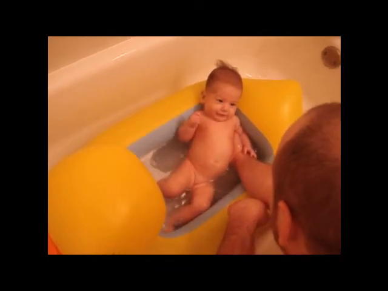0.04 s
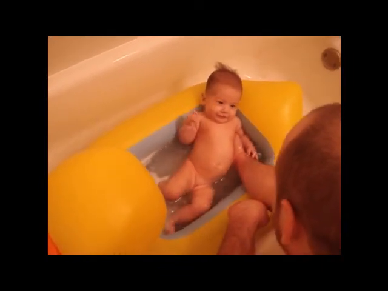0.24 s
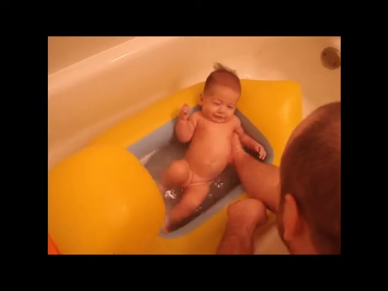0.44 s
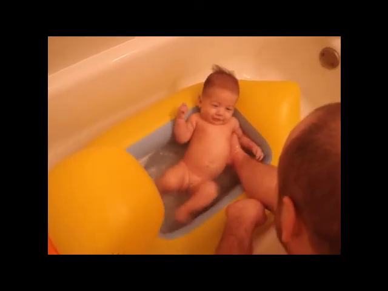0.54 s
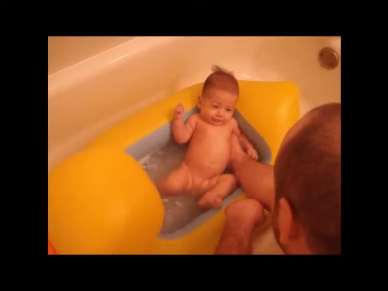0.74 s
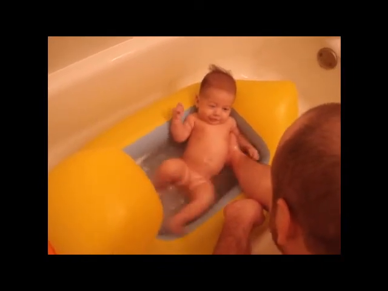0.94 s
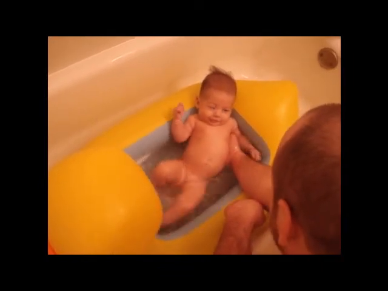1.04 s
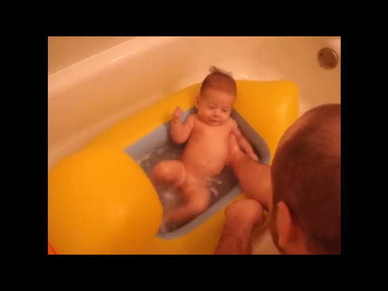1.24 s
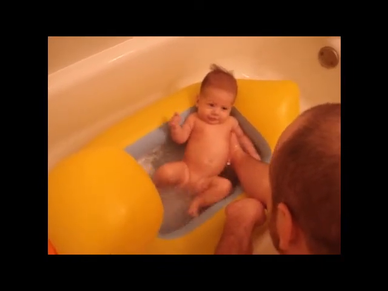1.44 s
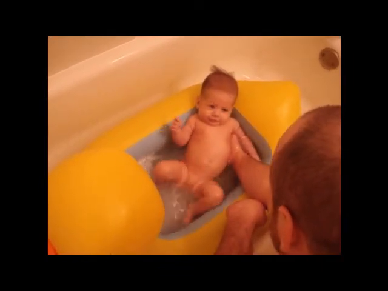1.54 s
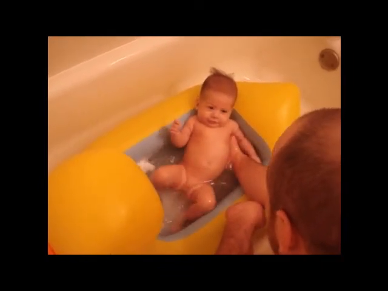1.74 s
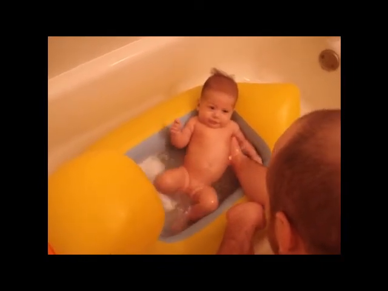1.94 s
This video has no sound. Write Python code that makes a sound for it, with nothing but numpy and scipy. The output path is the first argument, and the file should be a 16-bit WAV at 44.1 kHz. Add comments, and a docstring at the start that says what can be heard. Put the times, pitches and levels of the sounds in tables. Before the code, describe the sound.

Shallow bath water sloshes and splashes close to the microphone under a baby's kicks. A few quiet drips come first, then quick splashes with a soft low bump, then lighter ones. A fan hums faintly in the tiled room.

```python
"""Small legs kick in a shallow inflatable tub that stands in a hard bathtub, while a bathroom fan hums.
First come a few faint bubbles, trapped air ringing upward in pitch, and two soft held notes.
Then the kicks build: water splats and hisses as spray, and one low bump lands just past a second.
The biggest splash follows, squeezed air holds a few more wavering notes, and smaller splats close.
Tub walls and tiles echo the water throughout, over a soft noise floor."""
import sys
import numpy as np
from scipy import signal
from scipy.fft import rfft, irfft, next_fast_len
from scipy.io import wavfile

SR = 44100
rng = np.random.default_rng(int(sys.argv[2]) if len(sys.argv) > 2 else 0)


def transcribe(u):
    """Save the signal u as a 16-bit wav file named by the first command-line argument.

    u: samples, shape (n,) or (channels, n), limited to [-1, 1]; the rate is SR.
    q: integer samples, one column per channel.
    """
    v = np.clip(np.atleast_2d(u).T, -1, 1)
    q = np.round(v * 32767).astype(np.int16)
    wavfile.write(sys.argv[1], SR, q)


N = 88200


def bubbles():
    """Each pocket of trapped air rings as a dying sine that climbs in pitch."""
    # The clearest bubbles. Each row: start in seconds, level in dB, pitch in Hz, t60 in seconds.
    pockets = [(.078, -51, 2430, .04), (.190, -44.5, 2240, 0.015), (.261, -43.5, 2060, 0.023),
               (.667, -45.5, 1440, 0.038), (.704, -29.5, 2050, 0.0091), (.8045, -33, 840, 0.021),
               (.8046, -24, 1510, 0.0063), (.820, -32.5, 1590, 0.018), (.924, -32, 2100, 0.01),
               (.960, -39, 1340, 0.022), (.984, -30, 2620, 0.013), (1.0844, -30, 3840, 0.01),
               (1.0944, -16, 2630, 0.015), (1.102, -25, 2730, 0.0096), (1.1653, -24, 1876, 0.013),
               (1.2246, -29, 3120, 0.017), (1.2326, -19, 1590, 0.018), (1.233, -14, 955, 0.011),
               (1.241, -16.5, 1100, 0.012), (1.2496, -10.5, 1795, 0.0063), (1.2564, -23, 1970, 0.015),
               (1.249, -16.5, 1038, 0.01), (1.257, -23, 1050, 0.018), (1.2655, -15, 1060, 0.014),
               (1.2764, -29.5, 1282, 0.082), (1.2874, -9.5, 3130, 0.0035), (1.3054, -20.5, 1360, 0.06),
               (1.312, -13, 1623, 0.02), (1.319, -26.5, 1680, 0.029), (1.3264, -19, 1616, 0.023),
               (1.329, -17.5, 774, 0.031), (1.3334, -12.5, 1290, 0.018), (1.335, -16, 945, 0.0066),
               (1.371, -35, 783, 0.07), (1.372, -39, 1485, 0.047), (1.4072, -25, 3450, 0.0059),
               (1.427, -29, 1500, 0.021), (1.431, -27.5, 808, .04), (1.472, -25.5, 790, 0.01),
               (1.485, -45.5, 264.4, 0.16), (1.4945, -31, 2530, 0.011), (1.508, -25, 2420, 0.01),
               (1.572, -40.5, 847, 0.03), (1.5738, -28.5, 2300, 0.0097), (1.583, -32, 2540, 0.013),
               (1.735, -28, 774, 0.0095), (1.7434, -27, 1930, 0.0037), (1.8257, -28, 3030, 0.0076),
               (1.8293, -21, 3290, 0.012), (1.853, -36.5, 3410, 0.018), (1.8871, -37.5, 1560, 0.024),
               (1.8876, -34, 2370, 0.036)]
    rise, attack_s = 0.089, 0.00065  # rise: share by which the pitch climbs during one t60
    out, t = np.zeros(N + SR), np.arange(SR // 5) / SR
    for start, db, hz, t60 in pockets:
        phase = 2 * np.pi * hz * (t + rise * t * t / (2 * t60))
        envelope = amp(db - 60 * t / t60) * (1 - np.exp(-t / attack_s))
        i = int(start * SR)
        out[i:i + len(t)] += envelope * np.sin(phase)
    return out[:N]


def splats():
    """Each splat is a swarm of tiny bubbles: crackly noise around one pitch, quick to rise and die."""
    # Each row: start in seconds, level in dB, centre in Hz, width as a share of it, t60 in seconds.
    swarms = [(.590, -49.5, 3500, 1.8, 0.22), (.696, -49.5, 1970, 1.4, 0.4),
              (.755, -37.5, 5930, 0.55, 0.067), (.8040, -41, 5500, 1.2, 0.11),
              (0.8042, -41.5, 1550, 0.81, 0.19), (.848, -42, 4600, 0.41, 0.18), (.918, -45, 1800, 5, 0.11),
              (1.017, -51.5, 3000, 0.21, 0.21), (1.0932, -36, 2600, 0.19, 0.29),
              (1.0941, -39, 4230, 0.63, 0.24), (1.141, -35.5, 5500, 1.5, 0.18),
              (1.1654, -34.5, 2370, 0.99, 0.15), (1.2244, -35, 3100, 0.17, 0.078),
              (1.246, -31, 2800, 0.7, 0.36), (1.300, -36, 6000, 0.71, 0.17),
              (1.449, -38, 4300, 0.63, 0.094), (1.4935, -39.5, 2500, 0.15, 0.29),
              (1.5722, -48, 2400, 0.12, 0.24), (1.5746, -34, 3000, 0.68, 0.015),
              (1.594, -39, 5400, 0.79, 0.26), (1.734, -45.5, 1500, 0.67, 0.16),
              (1.78, -42, 2800, 0.24, 0.089), (1.8251, -32, 3120, 0.31, 0.11),
              (1.8243, -47.5, 5160, 0.47, 0.28), (1.8875, -40.5, 2370, 0.35, 0.17)]
    crackle_db = 4.5
    out, t = np.zeros(N + SR), np.arange(SR // 4) / SR
    for start, db, hz, width, t60 in swarms:
        noise, lumps = rng.standard_normal((2, len(t)))
        crackle = noise * amp(crackle_db * lumps)
        swarm = rms_one(resonate(resonate(crackle, hz, width * hz), hz, width * hz))
        attack_s = 0.0002 * amp(-51.5 - db)  # louder splats bite faster
        envelope = amp(db - 60 * t / t60) * (1 - np.exp(-t / attack_s))
        i = int(start * SR)
        out[i:i + len(t)] += envelope * swarm
    return out[:N]


def spray():
    """Fine drops hiss up and heavier water sloshes below, both riding the kicks."""
    # Swell of the fine drops. Each row: time in seconds, level in dB.
    swell = [(0, -66), (.24, -61), (.27, -54), (.35, -56), (.40, -66.5), (.57, -59), (.74, -59), (.76, -50),
             (.86, -49), (.885, -57.5), (.97, -57), (1.02, -45.5), (1.07, -61.5), (1.13, -54), (1.17, -40),
             (1.22, -48), (1.26, -37.5), (1.29, -51), (1.44, -52), (1.45, -38.5), (1.56, -57), (1.72, -80),
             (1.74, -46.5), (1.82, -62), (2, -55.5)]
    # Tone of the fine drops. Each row: frequency in Hz, relative gain in dB.
    treble = [(2500, -25), (4200, 5.5), (9800, -1), (11000, -70)]
    # Moving water. Each row: time in seconds, then high, middle and low band levels in dB.
    slosh = [(0, -66, -61.5, -61.5), (.3, -60, -60, -60.5), (.48, -60.5, -61, -57.5),
             (.71, -62, -54.5, -63), (0.822, -47.5, -50.5, -49), (.89, -58, -56, -57.5),
             (1.1, -55, -54.5, -62), (1.16, -48, -52, -45), (1.298, -51.5, -37.5, -47),
             (1.4, -51, -45, -62.5), (1.5, -48, -47, -48), (1.58, -58.5, -57, -60), (2, -57.5, -59, -61)]
    t = np.arange(N) / SR
    fine = amp(np.interp(t, *np.transpose(swell))) * coloured(droplets(4000, 11000), treble)
    times, *bands = np.transpose(slosh)
    high, middle, low = [amp(np.interp(t, times, db)) for db in bands]
    return fine + high * droplets(2080, 4090) + middle * droplets(574, 1953) + low * droplets(205.6, 649)


def droplets(low_hz, high_hz):
    """Dense random drops, each ringing briefly at one of ten pitches, on smooth noise; rms 1."""
    drops_per_s, ring_q, spread_db, drop_share = 5000, 9.2, 4.5, 0.67
    sizes = amp(spread_db * np.minimum(rng.exponential(1, N), 5)) * rng.choice([-1, 1], N)
    clicks = sizes * (rng.random(N) < drops_per_s / SR)
    pitches, pick = np.geomspace(low_hz, high_hz, num=10), rng.integers(0, 10, N)
    drops = sum(resonate(clicks * (pick == k), hz, hz / ring_q) for k, hz in enumerate(pitches))
    band = signal.butter(2, [low_hz, high_hz], "band", fs=SR, output="sos")
    patter = rms_one(signal.sosfilt(band, drops))
    smooth = rms_one(signal.sosfilt(band, rng.standard_normal(N)))
    return np.sqrt(drop_share) * patter + np.sqrt(1 - drop_share) * smooth


def air_notes():
    """Squeezed pockets of air each hold a note: a gliding sine with a wavering level."""
    # One curve a note. Each row: time in seconds, pitch in Hz, level in dB.
    curves = [
        [(.385, 525, -73), (.40, 522, -60), (.48, 495, -70)],
        [(.49, 410, -65), (.53, 385, -60.5), (.575, 360, -55.5)],
        [(1.437, 660, -44), (1.455, 700, -42), (1.475, 800, -42.5), (1.49, 740, -42), (1.518, 900, -38.5),
         (1.53, 780, -38), (1.56, 720, -60)],
        [(1.662, 860, -65), (1.672, 860, -54), (1.72, 850, -50)],
        [(1.662, 1770, -64), (1.675, 1690, -42), (1.687, 1660, -62), (1.715, 1640, -53)],
    ]
    wobble_hz, wobble_db = 61, 3.5
    lowpass = signal.butter(2, wobble_hz, fs=SR, output="sos")
    t, out = np.arange(N) / SR, 0
    for curve in curves:
        times, hz, db = np.transpose(curve)
        wobble = rms_one(signal.sosfilt(lowpass, rng.standard_normal(N)))
        faded_db = np.interp(t, [times[0] - .005, *times, times[-1] + .01], [-100, *db, -100])
        phase = 2 * np.pi * np.cumsum(np.interp(t, times, hz)) / SR
        out = out + np.sqrt(2) * amp(faded_db + wobble_db * wobble) * np.sin(phase)
    return out


def bump():
    """One low bump: a sudden push of pressure that swings back slowly."""
    start_s, db, swing_hz, t60_s, soften_hz = 1.1425, -25, 21.6, 0.072, 1500
    t = np.maximum(np.arange(N) / SR - start_s, 0)
    attack = 1 - np.exp(-2 * np.pi * soften_hz * t)
    return amp(db - 60 * t / t60_s) * np.cos(2 * np.pi * swing_hz * t) * attack


def wall_echoes(x):
    """Sound bounces between the hard walls, smeared and dying faster in the treble."""
    # Bathtub and tiled room. Each: round trips in seconds, three times the bass t60 in seconds,
    # level in dB.
    bathtub = ([.0023, .0031, .0041, .0053, .0067, .0079], 0.14, -7.5)
    room = ([.0089, .0107, .0131, .0157, .0181, .0223, .0269, .0311], 0.53, -12)
    dull_hz, scatter = 6000, 0.32
    size = next_fast_len(N + SR)
    hz, response = np.arange(size // 2 + 1) * SR / size, 0
    for lags, decay, db in (bathtub, room):
        for k, lag in enumerate(lags):
            loss_db = 60 * lag / decay * (3 + hz / dull_hz)
            loop = amp(-loss_db) * np.exp(-2j * np.pi * hz * lag)
            response = response + amp(db) * (-1) ** k * loop / (1 - loop)
    for lag in (0.001015, 0.001383, 0.0031):  # curved walls smear each echo: all-pass delays in seconds
        delay = np.exp(-2j * np.pi * hz * lag)
        response = response * (delay - scatter) / (1 - scatter * delay)
    return irfft(rfft(x, size) * response, size)[:N]


def fan():
    """The fan's air noise swells in one low resonance."""
    hz, width_hz, db = 146.8, 18.3, -55
    air = rng.standard_normal(N + SR)
    hum = resonate(resonate(air, hz, width_hz), hz, width_hz)
    return amp(db) * rms_one(hum[SR:])


def noise_floor():
    """A soft, steady bed of bass-heavy noise."""
    # Tone of the bed. Each row: frequency in Hz, relative gain in dB.
    tone = [(12, -21), (25, -18.5), (90, -3), (150, 4), (200, -5.5), (500, -25), (2000, -21.5),
            (11000, -43.5)]
    return amp(-57.5) * coloured(rng.standard_normal(N), tone)


def amp(db):
    """Decibels to gain."""
    return 10 ** (np.asarray(db) / 20)


def rms_one(x):
    """Scale to rms 1."""
    return x / np.sqrt(np.mean(x ** 2) + 1e-20)


def coloured(x, curve):
    """Shape x with an EQ curve of (Hz, dB) points; rms 1."""
    hz, db = np.transpose(curve)
    grid = np.maximum(np.arange(N // 2 + 1) * SR / N, 1)
    gain = amp(np.interp(np.log(grid), np.log(hz), db))
    return rms_one(irfft(rfft(x) * gain, N))


def resonate(x, hz, width_hz):
    """Ring x through a two-pole resonance."""
    r = np.exp(-np.pi * width_hz / SR)
    feedback = [1, -2 * r * np.cos(2 * np.pi * hz / SR), r * r]
    return signal.lfilter([1, 0, -1], feedback, x + 1e-18) * (1 - r * r) / 2


def scene():
    """Water up front with its echoes and the bump; fan and noise floor behind."""
    rings, held, thrown = bubbles(), air_notes(), spray() + splats()
    floor = noise_floor()
    echoes = wall_echoes(rings + amp(-10.5) * held + amp(-18.5) * thrown)
    return (rings + held + thrown + echoes + bump() + fan() + floor)[None]


def record(dry):
    """A steep low-pass takes off the very top."""
    cutoff_hz = 10250
    return signal.sosfilt(signal.ellip(12, .5, 48, cutoff_hz, fs=SR, output="sos"), dry)


dry = scene()
out = record(dry)
transcribe(out)
```